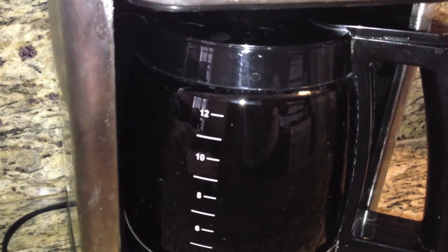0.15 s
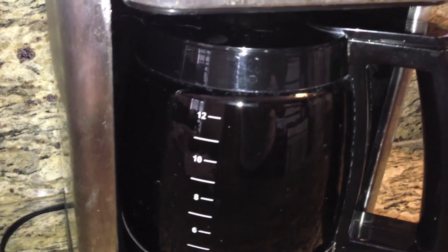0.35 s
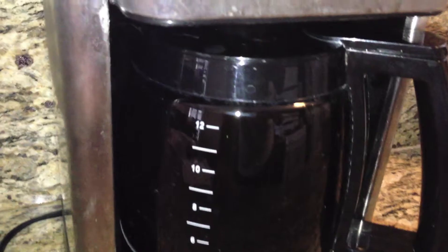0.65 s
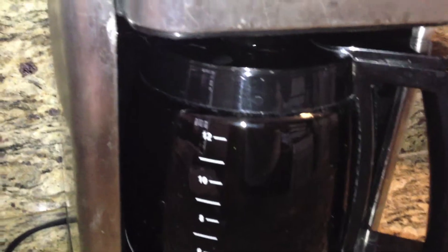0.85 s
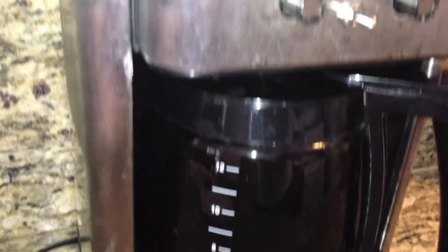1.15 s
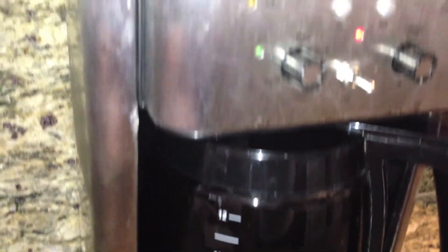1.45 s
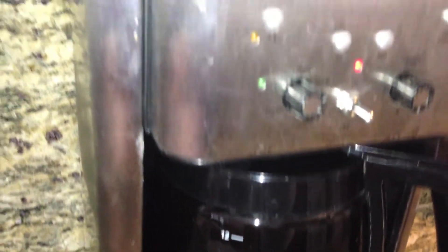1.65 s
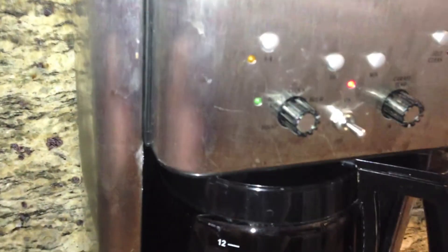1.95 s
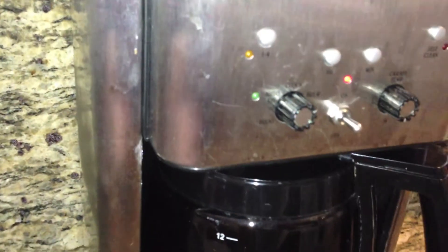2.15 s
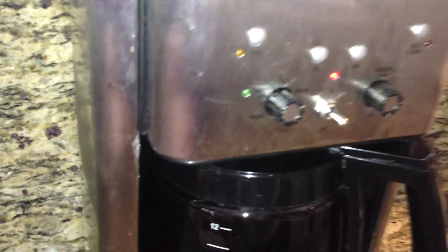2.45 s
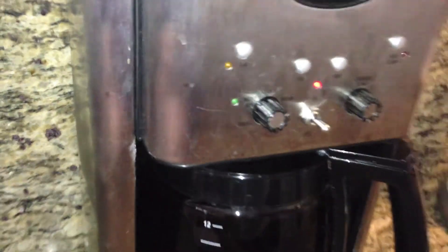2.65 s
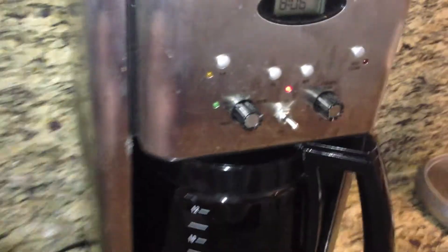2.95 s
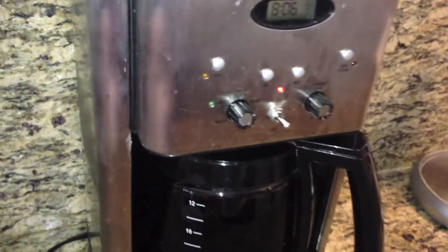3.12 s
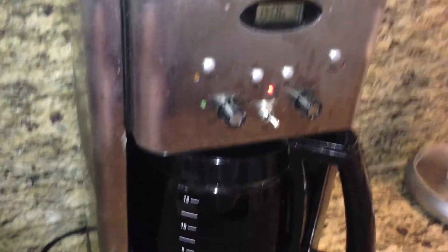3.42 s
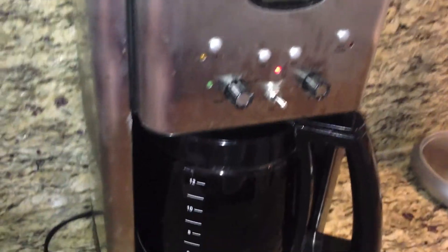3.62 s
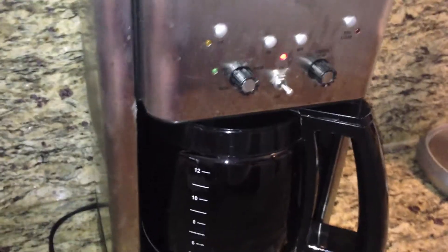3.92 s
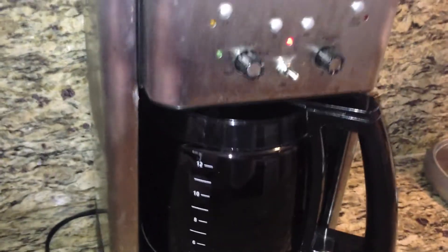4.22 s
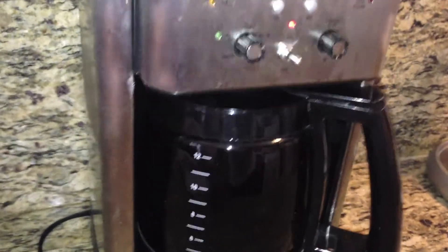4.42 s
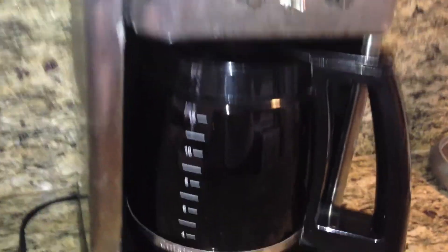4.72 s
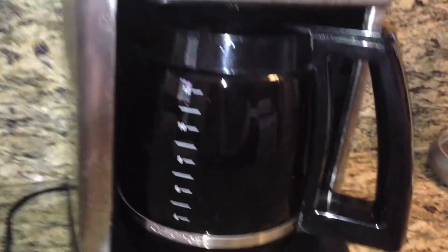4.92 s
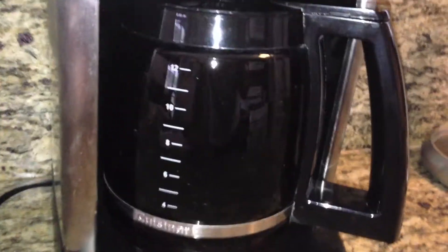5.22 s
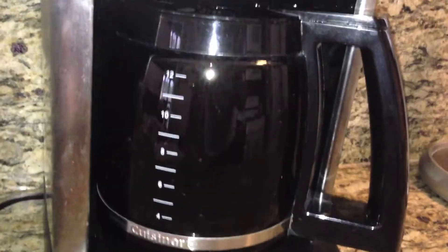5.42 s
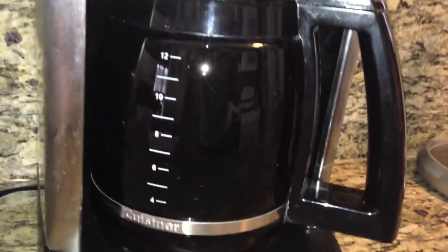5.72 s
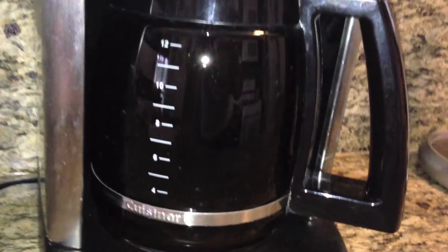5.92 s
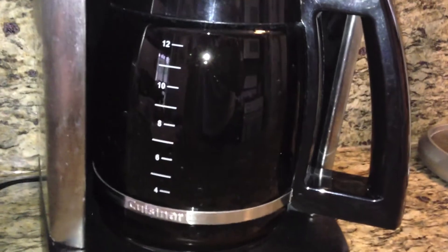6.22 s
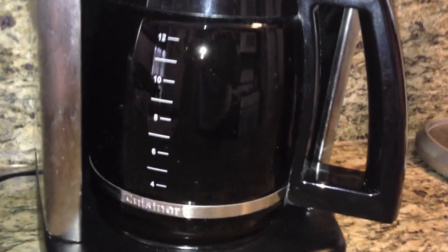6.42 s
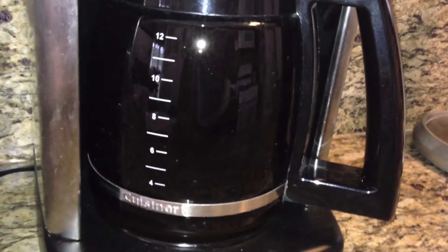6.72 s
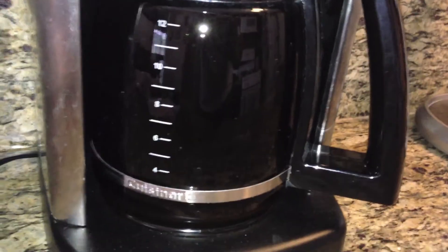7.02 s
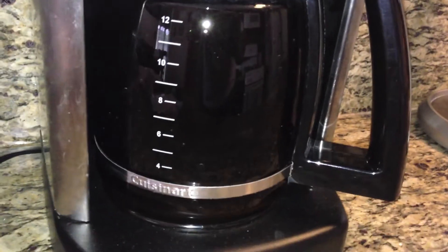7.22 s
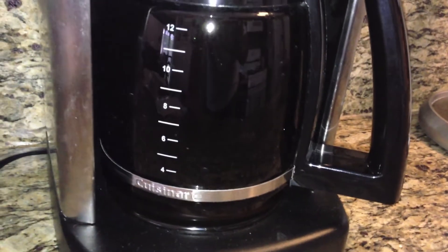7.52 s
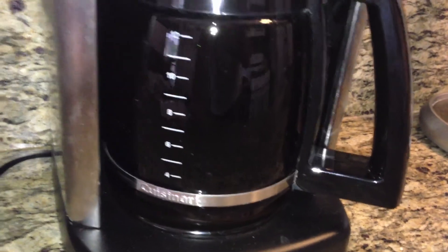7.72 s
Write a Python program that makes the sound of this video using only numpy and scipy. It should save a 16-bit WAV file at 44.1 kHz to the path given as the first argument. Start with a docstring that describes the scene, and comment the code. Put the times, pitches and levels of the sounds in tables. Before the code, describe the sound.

A drip coffee maker gurgles with hollow knocking pops and wet fizz, goes nearly quiet briefly, then bubbles harder to the end over faint hiss.

```python
"""A knocking gurgle and a wet fizz over steady hiss, the gurgle faint from about 1.3 to 2.5 s, then knocking
on to the end; scattered spits at the spray head, and one soft wash of steam near 1.2 s.
A drip coffee maker brews in a quiet kitchen. Steam bubbles collapse in the heater tube and strike housing,
basket, tube and metal, all banks of ringing modes. The tube's air column sinks, then rings higher as the
tank empties. Fizz and spits are ragged noise with bubble rings; steam and hiss are filtered noise."""
import sys
import numpy as np
from scipy import signal
from scipy.fft import rfft, irfft, next_fast_len
from scipy.io import wavfile

SR = 44100
rng = np.random.default_rng(int(sys.argv[2]) if len(sys.argv) > 2 else 0)


def put_to_file(sound):
    """Save the sound as 16-bit audio at rate SR, in the file named by the first command-line argument."""
    columns = np.atleast_2d(sound).T  # one column per channel
    safe = np.clip(columns, -1, 1)
    whole_steps = np.round(safe * 32767)
    wavfile.write(sys.argv[1], SR, whole_steps.astype(np.int16))


N = 346626

# loudest single collapses: start_s, level_db (before body gains), sharpness_db (metal blow re level)
POP_EVENTS = [(0.005, -9.5, -27), (0.083, -15.5, -43), (0.1, -10, -24.5), (0.116, -11, -21),
              (0.148, -24, -15), (0.168, -14, -29), (0.201, -23, -27), (0.26, -7.5, -26),
              (0.289, -9.5, -27.5), (0.333, -19, -35), (0.359, -7, -23), (0.396, -8, -22.5),
              (0.414, -10, -20.5), (0.442, -9.5, -37), (0.477, -16, -24), (0.516, -17, -12),
              (0.556, -20.5, -16), (0.573, -17.5, -14), (0.627, -13, -27), (0.712, -27, -43),
              (0.765, -14, -23), (0.822, -20.5, -10.5), (0.847, -17, -32), (0.903, -18, -20),
              (0.956, -18, -53), (1.04, -14, -61), (1.083, -14, -42), (1.17, -19.5, -25),
              (1.183, -8.5, -46), (1.204, -23, -46), (1.241, -23, -38), (1.253, -9.5, -52),
              (1.283, -20, -18.5), (1.379, -26, -15), (1.434, -15.5, -33), (1.621, -20, -17),
              (1.674, -14, -26), (1.763, -15.5, -49), (2.305, -17.5, -20), (2.48, -28, -7.5),
              (2.558, -17, -17.5), (2.588, -14, -32), (2.716, -19.5, -18.5), (2.731, -11, -49),
              (2.75, -18, -30), (2.813, -9.5, -42), (2.864, -11.5, -25.5), (2.891, -17, -42),
              (2.952, -8, -34), (2.982, -11, -16), (3.029, -13.5, -45), (3.071, -11.5, -38),
              (3.097, -23.5, -7.5), (3.185, -9.5, -37), (3.25, -11.5, -21), (3.281, -8, -33),
              (3.314, -9.5, -26), (3.343, -14, -23), (3.369, -10, -17), (3.403, -17, -26),
              (3.438, -13, -50), (3.498, -13, -29), (3.549, -12.5, -29), (3.625, -13, -16),
              (3.694, -13, -14.5), (3.771, -13, -28), (3.848, -18, -16), (3.95, -12.5, -14),
              (3.985, -11, -20), (4.033, -7, -20), (4.102, -17, -22), (4.132, -10, -17),
              (4.203, -12.5, -22.5), (4.242, -16.5, -55), (4.27, -11, -39), (4.282, -14, -13.5),
              (4.332, -24, -21), (4.358, -13.5, -15.5), (4.411, -3, -21.5), (4.461, -14, -15),
              (4.487, -8.5, -20.5), (4.523, -9, -17.5), (4.629, -18, -38), (4.646, -10.5, -22),
              (4.666, -21, -5), (4.686, -2, -16.5), (4.761, -6, -25), (4.772, -13.5, -10),
              (4.817, -8.5, -12), (4.845, -9.5, -12), (4.871, -6, -13), (4.924, -15.5, -43),
              (4.966, -7, -19), (4.998, -8.5, -32), (5.053, -11.5, -34), (5.077, -5.5, -16),
              (5.109, -8.5, -15.5), (5.127, -21, -12), (5.169, -15.5, -23), (5.218, -11, -18.5),
              (5.237, -9, -35), (5.274, -13, -15.5), (5.299, -31, 5), (5.339, -20.5, -13),
              (5.359, -15.5, -20), (5.383, -15.5, -14), (5.412, -10.5, -21), (5.488, -13, -20.5),
              (5.52, -8.5, -12), (5.605, -9, -22), (5.658, -7.5, -17), (5.697, -5, -22), (5.722, -11, -27),
              (5.779, -24, -10), (5.794, -8.5, -22), (5.838, -7, -21.5), (5.853, -19, -21),
              (5.882, -9.5, -22), (5.915, -21, -36), (5.932, -12.5, -20.5), (5.951, -13, -23),
              (5.987, -14.5, -18), (6.01, -9, -17), (6.057, -10, -17.5), (6.069, -6, -21.5),
              (6.107, -14, -38), (6.141, -7.5, -17.5), (6.175, -11, -31), (6.195, -26, -16),
              (6.246, -13, -20), (6.273, -11, -16.5), (6.331, -6, -16), (6.356, -9.5, -20),
              (6.433, -12.5, -25), (6.449, -27, -1.5), (6.467, -12.5, -25), (6.534, -7, -17.5),
              (6.548, -4.5, -20.5), (6.573, -13, -29), (6.635, -7, -22.5), (6.675, -9, -30.5),
              (6.736, -11.5, -12.5), (6.771, -7.5, -21), (6.822, -27, -36), (6.856, -10.5, -23),
              (6.9, -4, -24), (6.95, -9, -19.5), (6.974, -21, -15), (7.015, -7, -17), (7.067, -6, -15.5),
              (7.121, -18, -33), (7.157, -18, -11), (7.212, -9, -16.5), (7.248, -10.5, -18.5),
              (7.342, -12, -30), (7.361, -9, -27), (7.413, -14.5, -18), (7.434, -16, -18),
              (7.493, -12.5, -16), (7.558, -7, -13), (7.624, -5, -24), (7.678, -8.5, -22.5),
              (7.717, -18, -18), (7.761, -10.5, -10.5), (7.795, -9, -19), (7.819, -13, -16)]
# dense boil of small collapses: time_s, vigour_db, sharpness_db (drive of the metal, before its gain)
BOIL_CURVE = [(0, -13, -11.5), (.07, -60.5, 1), (.14, -22.5, -2.5), (.24, -41.5, -29), (.42, -43.5, 3),
              (.8, -47, -23), (1.5, -55, -2.5), (2.45, -54.5, -11), (2.6, -37, -9), (2.8, -29.5, -17),
              (3.2, -32.5, -6.5), (3.6, -26.5, -8.5), (4.05, -30, -6.5), (4.55, -27, -12),
              (5.0, -29.5, -7.5), (5.6, -32.5, -11.5), (7.86, -35.5, -11)]
# spits at the spray head: start_s, level_db (before splash and bubble gains), pitch_hz
SPIT_EVENTS = [(0.442, -48, 2160), (0.8217, -45, 2070), (1.3762, -50.5, 1784), (1.466, -50, 1750),
               (1.853, -48.5, 2630), (1.905, -49, 1920), (1.9294, -51, 2720), (1.984, -54.5, 2380),
               (2.042, -52.5, 2470), (2.092, -47.5, 1890), (2.14, -51.5, 2640), (2.1928, -46.5, 2450),
               (2.2764, -48.5, 1860), (2.387, -51.5, 2750), (2.4294, -47, 1880), (2.4456, -51, 1980),
               (2.518, -49, 1900), (3.918, -40, 2300), (3.956, -42, 2330), (4.8226, -44, 2500),
               (6.07, -42.5, 2820)]
# air column in the tube: time_s, pitch_hz, tube_db (boil's drive of the tube, before its gain),
# basket_db (drive of the basket), fizz_db (before the boil's share)
COLUMN_CURVE = [(0, 764, -9.5, -3.5, -29), (1.1, 764, -7, -8.5, -31.5), (1.9, 663, -15, -2, -33),
                (2.5, 645, -10.5, -1.5, -32), (3.6, 717, -4.5, -1, -34.5), (4.1, 678, -4.5, -1.5, -43),
                (4.8, 850, -10, -4.5, -34), (7.86, 908, -41, -5, -37.5)]
# ringing modes of each part: pitch_hz, level_db (relative), t60_s
HOUSING_MODES = [(128.5, -15.5, 0.51), (156.3, -4, 0.2), (201, -4.5, 0.11), (250.7, 1, 0.085),
                 (283, -7.5, 0.037)]
BASKET_MODES = [(374.5, -5, 0.079), (413.2, -4, 0.12), (462.3, -0.5, 0.062), (520, -1.5, 0.068)]
TUBE_MODES = [(600.6, -6.5, 0.15), (697.5, -3, 0.081), (786, 3, 0.029), (831, 2, 0.052), (924, 2.5, 0.074),
              (1033.4, 9.5, 0.067)]
METAL_MODES = [(1643, -7.5, 0.015), (2218, -2, 0.016), (2274, -2.5, 0.04), (2470, 2.5, 0.025),
               (2632, 2, 0.022), (2806, 2.5, 0.012), (3270, -6, 0.028), (3380, -8.5, 0.023),
               (3600, -8.5, 0.012), (4100, -17, 0.019)]
# hiss spectrum: freq_hz, density_db (relative, per Hz)
HISS_SPECTRUM = [(40, -40), (120, -0.5), (400, -5.5), (1200, -30), (3000, -9.5), (6000, -13),
                 (15500, -14.5)]
# water floods the tube, gurgle and fizz sink until it clears: clear_s, depth_db (each flood alone)
FLOOD_EVENTS = [(2.7, -5.5), (3.247, -9), (3.44, -6.5), (3.77, -4.5), (4.098, -9), (4.458, -10.5),
                (4.757, -8), (4.923, -9.5), (5.055, -16), (5.169, -7), (5.337, -3), (5.792, -3.5),
                (6.432, -9), (6.737, -7.5), (7.013, -1.5), (7.342, -11)]

HISS_RMS_DB, CUTOFF_HZ = -52.5, 15400
TUBE_POP_DB, TUBE_FOLLOWS = -1.5, 0.61  # tube blow: offset, share of a pop's sharpness
FIZZ_FOLLOWS = 0.26  # share of (vigour_db + sharpness_db) passed to the fizz
HUSH_S, HUSH_DB, HUSH_MID_DB = 0.019, -1, -21.5  # time constant, full dip, pop level that gives half of it
FLOOD_S = 0.057  # time constant
BASKET_PER_COLUMN = -0.63  # octaves per octave: favoured basket pitch sinks as the column rises
METAL_SCATTER_DB = 2.2
BOIL_RING_HZ = 2380  # small collapses ring the metal mostly near here
GLIDE_OCTAVES = 0.16
BLIP_SHARE = 0.4  # chance that a small collapse drives a given housing, basket or tube mode


def from_db(db):
    """Gain of a level in dB."""
    return 10 ** (np.asarray(db) / 20)


def rms_one(x):
    """Scaled to rms 1."""
    return x / np.sqrt(np.mean(x ** 2) + 1e-20)


def in_time(rows):
    """Each column of a curve, one value a sample."""
    time_s, *columns = np.transpose(rows)
    return [np.interp(np.arange(N) / SR, time_s, c) for c in columns]


def drift(rate_hz):
    """Slow random wander, rms about 1: low-passed noise at SR / 40, interpolated."""
    r = np.exp(-80 * np.pi * rate_hz / SR)
    noise = rng.standard_normal(N // 40 + 2002)
    slow = signal.lfilter([1], [1, -2 * r, r * r], noise)[2000:]  # drop the settling
    return np.interp(np.arange(N) / 40, np.arange(len(slow)), rms_one(slow))


def decay(x, t60_s):
    """Each click becomes an exponential decay."""
    return signal.lfilter([1], [1, -from_db(-60 / (t60_s * SR))], x)


def lead_up(marks, time_s):
    """Each mark becomes an exponential rise that ends at it."""
    return signal.lfilter([1], [1, -np.exp(-1 / (time_s * SR))], marks[::-1])[::-1]


def filtered(x, order, edge_hz, kind):
    """Butterworth filter."""
    return signal.sosfilt(signal.butter(order, edge_hz, kind, fs=SR, output="sos"), x)


def ring(clicks, hz, t60_s):
    """Resonator: a unit click sets off a decaying sine of initial height about 1."""
    r, w = from_db(-60 / (t60_s * SR)), 2 * np.pi * hz / SR
    return signal.lfilter([0, np.sin(w)], [1, -2 * r * np.cos(w), r * r], clicks + 1e-18)


def grains(per_s, spread_db):
    """Random clicks of uneven size and either sign; rms 1."""
    size_db = spread_db * np.minimum(rng.exponential(1, N), 2.5)
    sizes = from_db(size_db) * rng.choice([-1, 1], N)
    return rms_one(sizes * (rng.random(N) < per_s / SR))


def blows(start_s, level_db, rattle_t60_s, rattle_db):
    """A click at each time, then a dying rattle of smaller collapses."""
    clicks = np.zeros(N)
    clicks[(np.array(start_s) * SR).astype(int)] = from_db(level_db)
    rattle = decay(clicks, rattle_t60_s) * grains(900, spread_db=1.0)
    return clicks + from_db(rattle_db) * rattle


def body(modes, force, scatter_db, shape_db, count=1):
    """Modes driven by force(hz) with wandering strength; the sign flips after every count modes."""
    out = np.zeros(N)
    for k, (hz, level_db, t60_s) in enumerate(modes):
        share = from_db(level_db + shape_db(hz) + scatter_db * drift(46.0))
        out += (-1) ** (k // count) * ring(share * force(hz), hz, t60_s)
    return out


def hush(start_s, level_db):
    """Slight dip of the boil, in dB, while a large bubble grows, ending at its collapse."""
    marks = np.zeros(N)
    marks[(start_s * SR).astype(int)] = np.clip((level_db - HUSH_MID_DB) / 6 + .5, 0, 1)
    return HUSH_DB * np.minimum(lead_up(marks, HUSH_S), 1)


def housing(pops, blips, glide):
    """Low modes of the housing, strongest near a gliding pitch."""
    return body(HOUSING_MODES, lambda hz: from_db(-3.0) * pops + from_db(-12.5) * blips(), 1.7,
                lambda hz: -14 * np.abs(np.log2(hz / 215) - 2 * glide), count=2)


def basket(pops, blips, glide, column_hz, basket_db):
    """Basket modes, strongest near a pitch that glides and moves against the air column."""
    favoured = glide + BASKET_PER_COLUMN * np.log2(column_hz / 750)  # octaves re 440 Hz
    return body(BASKET_MODES,
                lambda hz: from_db(basket_db) * (from_db(-0.5) * pops + from_db(-14.5) * blips()), 1.94,
                lambda hz: -30 * np.abs(np.log2(hz / 440) - favoured))


def tube(pops, blips, column_hz, tube_db):
    """Tube modes; those near the pitch of the air column are favoured."""
    boil_gain = from_db(tube_db - 20.5)
    return body(TUBE_MODES, lambda hz: pops + boil_gain * blips(), 3.9,
                lambda hz: -24 * np.abs(np.log2(hz / column_hz)))


def metal(pops, boil, column_hz):
    """Short bright modes of the metal; a higher air column brightens them."""
    return body(METAL_MODES,
                lambda hz: pops + from_db(-18 * abs(np.log2(hz / BOIL_RING_HZ))) * boil, METAL_SCATTER_DB,
                lambda hz: 40 * np.log2(column_hz / 820) * np.log2(max(hz, 2200) / 2600))


def spray(force):
    """Fine crackling noise that puffs up with each blow to the metal."""
    puffs = decay(np.abs(force), 0.06)
    return filtered(puffs * grains(2500, spread_db=7.5), 3, [3500, 8000], "band")


def gurgle():
    """Pops and boil together shake housing, basket, tube and metal, and throw a little spray."""
    start_s, level_db, sharp_db = np.transpose(POP_EVENTS)
    boil_db, metal_db = in_time(BOIL_CURVE)
    column_hz, tube_db, basket_db, _ = in_time(COLUMN_CURVE)
    clumps_db = 3 * np.minimum(drift(25), 1)  # small collapses come in clumps
    boil = from_db(boil_db + clumps_db + hush(start_s, level_db)) * grains(500, spread_db=3.0)

    def blips():
        """A fresh random share of the small collapses."""
        return boil * (rng.random(N) < BLIP_SHARE)

    tube_level_db = level_db + TUBE_POP_DB + TUBE_FOLLOWS * sharp_db
    pops = blows(start_s, level_db, rattle_t60_s=0.078, rattle_db=-30.5)
    tube_pops = blows(start_s, tube_level_db, rattle_t60_s=0.15, rattle_db=-33.5)
    metal_pops = from_db(-4.0) * blows(start_s, level_db + sharp_db, rattle_t60_s=0.069, rattle_db=-21.5)
    metal_boil = from_db(metal_db - 24.5) * boil
    # favoured pitch wanders as the bubbles grow and shrink
    glide = GLIDE_OCTAVES * np.tanh(drift(9.3))

    low = housing(pops, blips, glide) + basket(pops, blips, glide, column_hz, basket_db)
    low += tube(tube_pops, blips, column_hz, tube_db)
    low = filtered(low, 2, 135, "high")  # the small housing radiates little deep bass
    # plastic and water pass little above the tube's modes
    edge = signal.cheby2(4, 26, 1230, fs=SR, output="sos")
    bright = metal(metal_pops, metal_boil, column_hz)
    return signal.sosfilt(edge, low) + bright + from_db(-25.0) * spray(metal_pops + metal_boil)


def crackle():
    """Wet fizz of steam through the grounds: ragged puffs, each ringing a small bubble of one of 12 pitches."""
    clicks, noise = np.abs(grains(260, spread_db=4.5)), rng.standard_normal(N)
    pitches_hz, dealt = np.geomspace(700, 4200, 12), rng.integers(0, 12, N)
    wet = np.zeros(N)
    for k, hz in enumerate(pitches_hz):
        puffs = noise * decay(clicks * (dealt == k) + 1e-18, 0.061)
        wet += ring(puffs, hz, 5.2 / hz) * (hz / 1000) ** 0.39
    boil_db, metal_db = in_time(BOIL_CURVE)
    fizz_db = in_time(COLUMN_CURVE)[3]
    return from_db(fizz_db + FIZZ_FOLLOWS * (boil_db + metal_db)) * rms_one(wet)


def hiss():
    """Steady noise of room and microphone, coloured in the spectrum."""
    size = next_fast_len(N)
    hz = np.maximum(np.arange(size // 2 + 1) * SR / size, 1)
    freq_hz, density_db = np.transpose(HISS_SPECTRUM)
    colour = from_db(np.interp(np.log(hz), np.log(freq_hz), density_db))
    noise = irfft(rfft(rng.standard_normal(size)) * colour, size)[:N]
    return from_db(HISS_RMS_DB) * rms_one(noise)


def counter(x):
    """Two echoes, from counter and wall: delayed, quieter copies."""
    out = x.copy()
    for lag_s, echo_db in [(.0091, -19), (.021, -15)]:
        lag = int(lag_s * SR)
        out[lag:] += from_db(echo_db) * x[:N - lag]
    return out


def spits():
    """Each spit is some ms of ragged droplet splash and a short bubble ring."""
    out = np.zeros(N + SR)
    t = np.arange(int(.06 * SR)) / SR
    shape = len(SPIT_EVENTS), len(t)
    size = shape[0] * shape[1]
    ragged = from_db(1.3 * drift(180)[:size].reshape(shape))
    splash = grains(2500, spread_db=4.5)[:size].reshape(shape) * ragged
    splash = filtered(splash, 2, [600, 5500], "band")
    beats_hz = rng.uniform(25, 70, len(SPIT_EVENTS))  # two bubbles of nearly one size beat
    swell = 1 - np.exp(-t / 0.0035)
    for (start_s, level_db, hz), noise, beat_hz in zip(SPIT_EVENTS, splash, beats_hz):
        tone = np.sin(2 * np.pi * hz * t) * np.cos(2 * np.pi * beat_hz * t)
        bubble = from_db(25.0) * np.exp(-t / 0.0064) * tone
        splash_tail = from_db(16.0) * np.exp(-t / 0.013) * noise
        i = int(start_s * SR)
        out[i:i + len(t)] += from_db(level_db) * swell * (splash_tail + bubble)
    return out[:N]


def steam():
    """One soft wash of escaping steam around 1.2 s, while the boil is faint: band-passed noise."""
    t = np.arange(N) / SR
    jet = filtered(rng.standard_normal(N), 2, [3000, 9000], "band")
    return from_db(-53.5) * np.exp(-((t - 1.2) / 0.19) ** 4) * rms_one(jet)


def floods():
    """Level loss in dB as water floods the tube, deepening up to each clearing."""
    clear_s, depth_db = np.transpose(FLOOD_EVENTS)
    marks = np.zeros(N)
    marks[(clear_s * SR).astype(int)] = depth_db
    return lead_up(marks, FLOOD_S)


def scene():
    """The machine, its echoes and the hiss."""
    brew = from_db(floods()) * (gurgle() + crackle())
    return (counter(brew + spits() + steam()) + hiss())[None]


def record(dry):
    """The small microphone loses deep bass and rounds the highest peaks; the top is cut."""
    thin = filtered(dry, 1, 90, "high")
    rounded = .7 * np.tanh(thin / .7)
    return signal.sosfilt(signal.ellip(12, .5, 80, CUTOFF_HZ, fs=SR, output="sos"), rounded)


dry = scene()
out = record(dry)
put_to_file(out)
```